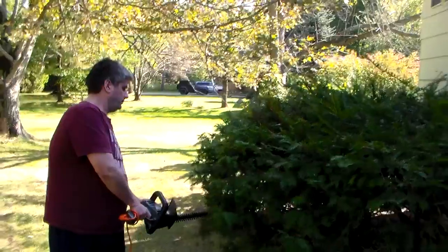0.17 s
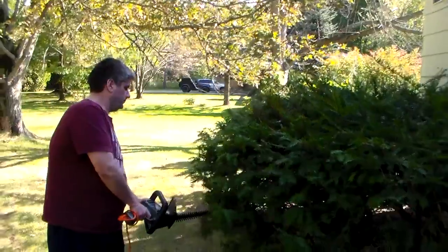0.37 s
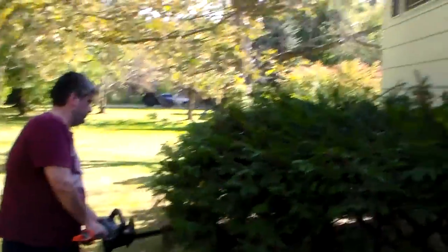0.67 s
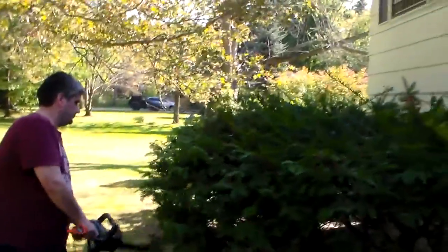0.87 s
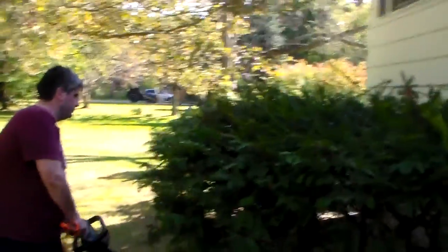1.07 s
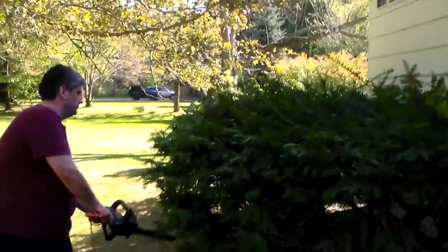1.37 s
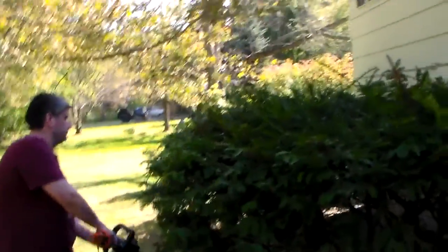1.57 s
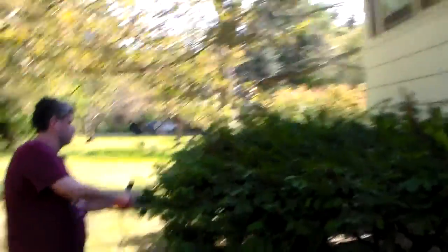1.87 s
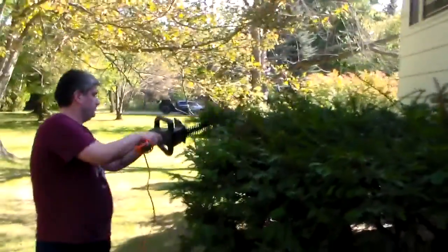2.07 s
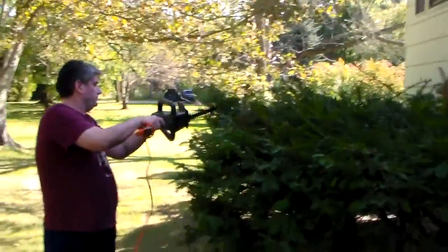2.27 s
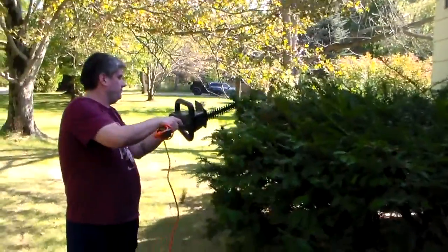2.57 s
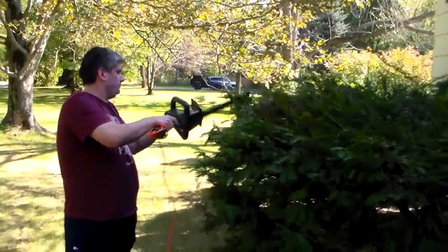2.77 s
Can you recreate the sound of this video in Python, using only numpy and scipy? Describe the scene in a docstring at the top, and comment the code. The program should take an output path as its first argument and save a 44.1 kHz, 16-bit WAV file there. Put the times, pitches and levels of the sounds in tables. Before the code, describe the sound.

An electric hedge trimmer runs continuously outdoors, a few metres off, its motor whining and steel blades rattling. Wind puffs on the microphone at first, twigs crack, then the motor slows and strains with a metallic hiss.

```python
"""Hedge trimmer in a yard

A corded electric trimmer works up the side of a bush, a few metres from the microphone. Its motor whines
and, through a gear pair, drives blades that clatter on every stroke and snip twigs. Raised to the top of
the bush it labours: the speed sags and the gears howl. A breeze bumps the microphone."""
import sys
import numpy as np
from scipy import signal
from scipy.fft import rfft, irfft, next_fast_len
from scipy.io import wavfile
from scipy.ndimage import uniform_filter1d, map_coordinates

SR = 44100
rng = np.random.default_rng(int(sys.argv[2]) if len(sys.argv) > 2 else 0)


def wrap_up_sound(samples):
    """Save the sound to the file named by the first command line argument, as 16-bit audio."""
    columns = np.atleast_2d(samples).T
    # keep every value between -1 and 1, then stretch to whole-number steps
    tamed = np.clip(columns, -1, 1)
    steps = np.round(tamed * 32767).astype(np.int16)
    wavfile.write(sys.argv[1], SR, steps)


N = 128772
FFT_SIZE = next_fast_len(N + 8192)
TIME, FREQ = np.arange(N) / SR, np.fft.rfftfreq(FFT_SIZE, 1 / SR)
PINION_TEETH, WHEEL_TEETH = 8, 50
ENTER_S, LIFT_S, RAISE_S = 0.57, 1.53, 2.007  # the bar goes into the bush, up its side, onto the top


def amp(db):
    """Decibels to gain."""
    return 10 ** (np.asarray(db) / 20)


def unit(x):
    """Scale to rms 1."""
    return x / np.sqrt(np.mean(x ** 2) + 1e-20)


def along(points):
    """(frequency [Hz], value) points read on a log axis."""
    hz, values = np.transpose(points)
    return np.interp(np.log(FREQ + 1), np.log(hz + 1), values)


def curve(rows):
    """(time [s], value) points joined up, one value a sample."""
    return np.interp(TIME, *np.transpose(rows))


def swells(rows):
    """Bell-shaped rises in gain from (time [s], width [s], level [dB]) rows."""
    return sum(amp(db) * np.exp(-.5 * ((TIME - s) / width) ** 2) for s, width, db in rows)


def wobble(rate):
    """A smooth random curve, rate knots a second."""
    return map_coordinates(rng.standard_normal(8192), [TIME * rate], mode="wrap")


def moved(at_s, move_s=0.23):
    """Progress 0-1 of a change of grip centred on at_s."""
    return np.clip((TIME - at_s) / move_s + .5, 0, 1)


def ring(x, colour):
    """Pass x through a causal body of the given colour; rms 1."""
    cepstrum = irfft(np.log(np.maximum(amp(along(colour)), 1e-5)), FFT_SIZE)
    cepstrum[1:FFT_SIZE // 2] *= 2  # fold to minimum phase
    cepstrum[FFT_SIZE // 2 + 1:] = 0
    return unit(irfft(rfft(x, FFT_SIZE) * np.exp(rfft(cepstrum)), FFT_SIZE)[..., :N])


def spread(pair, alike=None):
    """Mix two unrelated signals to left and right with the given likeness, by default the tool's."""
    # left-right likeness of the tool at the microphone (frequency [Hz], correlation [-1 to 1])
    tool_alike = [(150, 1), (300, 1), (650, 0.98), (1400, 1), (2900, 0.93), (4500, 0.9), (6500, 0.4),
                  (8200, 0.24), (14000, .3)]
    turn = np.arccos(np.clip(along(alike or tool_alike), -1, 1)) / 2
    mid, side = irfft(rfft(pair, FFT_SIZE) * [np.cos(turn), np.sin(turn)], FFT_SIZE)[:, :N]
    return unit(np.array([mid + side, mid - side]))


def grit(ticks_per_s=1500, scatter_db=2.5, tick_share=0.46):
    """Two channels of rubbing noise with tiny metal contacts in it."""
    contacts = rng.random(N) < ticks_per_s / SR
    strength = amp(scatter_db * np.clip(rng.standard_normal(N), -2, 2))
    ticks = unit(contacts * strength * rng.choice([-1, 1], (2, N)))
    return np.sqrt(tick_share) * ticks + np.sqrt(1 - tick_share) * rng.standard_normal((2, N))


def stroke_count(turns, lag_strokes=0.11):
    """Blade strokes made so far; they come a little later at the top of the bush."""
    return turns * PINION_TEETH / WHEEL_TEETH - lag_strokes * moved(RAISE_S)


def stroke_force(turns, rise_s=.0014, scatter_s=.0009, scatter_db=.9, drag_db=.5):
    """The blades knock through their play each stroke and rub in between; the foliage drags unevenly."""
    # knocks within one stroke (place in the stroke [0-1], relative level [dB], decay [s])
    knocks = [(.65, 0, .0045), (.88, -1, .0045)]
    # rubbing, stronger deep in the bush (time [s], level against a knock [dB])
    rub = [(.12, -9), (.42, -8.5), (.6, -3.5), (.8, -5), (1.9, -3), (2.1, -5.5)]
    # the blades bite harder or run slack for a moment (time [s], width [s], change in force [dB])
    bites = [(.432, .01, -4), (.89, .012, -3), (1.258, .008, -5), (1.945, .014, 3), (2.012, .012, -3),
             (2.155, .02, -3), (2.36, .008, -4)]
    strokes = stroke_count(turns)
    count = int(strokes[-1]) + 1
    power, t = np.zeros(N + SR), TIME[:SR // 30]
    for place, db, decay in knocks:
        shape = ((1 - np.exp(-t / rise_s)) * np.exp(-t / decay)) ** 2
        late, hard = np.clip(rng.standard_normal((count, 2)), -1.5, 1.5).T
        times = np.interp(np.arange(count) + place, strokes, TIME, right=TIME[-1] + .1) + scatter_s * late
        hits = np.bincount(np.abs(times * SR).astype(int), amp(db + scatter_db * hard) ** 2, N + SR)
        power += signal.fftconvolve(hits, shape / shape.max())[:N + SR]
    force = np.sqrt(np.abs(power[:N]) + amp(curve(rub)) ** 2)
    bite_db = sum(db * np.exp(-.5 * ((TIME - s) / width) ** 2) for s, width, db in bites)
    return unit(force * amp(bite_db + drag_db * wobble(30)))


def rattle(force, poses):
    """Grit driven by the force rings a body, cross-faded over (colour, share of power) poses."""
    return sum(np.sqrt(share) * spread(ring(force * grit(), colour)) for colour, share in poses)


def blades(force):
    """Steel clatter whose colour changes with the way the tool is held."""
    # blade clatter (time [s], level [dB])
    clatter = [(.12, -27.5), (.3, -30.5), (.5, -29), (.65, -29), (.8, -29), (1.1, -28), (1.94, -30),
               (2.01, -31), (2.08, -28.5), (2.25, -29), (2.4, -29.5), (2.92, -28.5)]
    # its colour running light, in the side of the bush, going up, on top (frequency [Hz], gain [dB])
    light = [(820, -34), (1400, -19), (1540, -20), (1620, -7.5), (1830, -13.5), (1950, -6), (2230, -2.5),
             (2330, -19), (2440, -5), (2610, -5), (2790, -12), (2910, -5), (3040, -9), (3430, -13),
             (4060, -11), (5110, -8.5), (5670, -21), (7180, -18), (8200, -28), (16000, -120)]
    side = [(820, -45), (1400, -8.5), (1550, -7), (1830, -0.5), (2590, 0), (3250, -8.5), (3660, -5.5),
            (4000, -7), (4610, -5.5), (5970, -16), (6620, -14), (8200, -18.5), (15000, -120)]
    lifting = [(820, -31), (1400, -6), (1530, -10), (1830, 2), (2120, -2), (2330, 1), (2530, -5.5),
               (2850, -0.5), (3140, -11.5), (3560, -1.5), (3890, -8), (4810, -7), (6190, -20), (6720, -15),
               (8200, -23), (15000, -120)]
    top = [(820, -49), (1400, -40), (1620, -7.5), (1710, -14.5), (1850, -3.5), (1940, -16.5), (2060, -1.5),
           (2150, -3.5), (2350, -15), (2440, -12.5), (2700, -5), (3110, -11), (3350, -18), (3770, -9),
           (3940, -17), (4280, -14), (5000, -17), (5920, -25), (6280, -22), (7620, -30), (15000, -120)]
    entered, lifted, raised = moved(ENTER_S), moved(LIFT_S), moved(RAISE_S)
    poses = [(light, 1 - entered), (side, entered * (1 - lifted)),
             (lifting, lifted * (1 - raised)), (top, raised)]
    return amp(curve(clatter)) * rattle(force, poses)


def housing(force, pulsing=0.24):
    """The plastic shell rings under the same strokes, more evenly."""
    # ring of the shell (time [s], level [dB])
    level = [(.12, -35), (.6, -34.5), (.8, -32.5), (.97, -34), (1.15, -33.5), (1.6, -35.5), (1.85, -32.5),
             (2.1, -35), (2.35, -36)]
    # its colour held low and on top of the bush (frequency [Hz], gain [dB])
    low = [(120, -33), (200, -16), (259, -15), (294, -12.5), (329, -13), (518, -11.5), (579, 0), (647, 0.5),
           (788, -3.5), (951, -8.5), (1040, -6), (1180, -3), (1350, -5.5), (1550, -12), (2020, -47),
           (3410, -120)]
    top = [(120, -38), (200, -12.5), (263, -12.5), (287, -21.5), (407, -13.5), (483, -13), (522, -5.5),
           (564, -7.5), (669, 1), (723, -8.5), (781, -7), (881, -3), (1110, 0), (1330, -6.5), (1550, -8),
           (2020, -30), (3410, -120)]
    raised = moved(RAISE_S)
    return amp(curve(level)) * rattle(force ** pulsing, [(low, 1 - raised), (top, raised)])


def patchy(x, depth_db=1.8):
    """Narrow bands swell and fade as the tool shifts."""
    spectra = signal.stft(x, nperseg=1024)[2]
    patches = uniform_filter1d(rng.standard_normal(spectra.shape[1:]), size=3, axis=0)
    patches = uniform_filter1d(patches, size=12, axis=1)
    return signal.istft(spectra * amp(depth_db * unit(patches)), nperseg=1024)[1][:, :N]


def steel(force):
    """Every knock rings the tool's modes anew; they come and go as the bush damps or frees the bar."""
    # modes of the tool (frequency [Hz], t60 [s], clearest at [s], width [s], level [dB])
    modes = [(2500, .2, .35, .25, -37.5), (3015, .1, .3, .22, -37.5), (2860, .08, 1.93, .1, -35),
             (1270, .08, 2.02, .07, -34)]
    t = TIME[:SR // 3]
    blows = force ** 2 * grit()[0]
    ringing = np.zeros(N)
    for hz, t60, *swell in modes:
        ping = amp(-60 * t / t60) * np.sin(2 * np.pi * hz * t)
        ringing += swells([swell]) * unit(signal.fftconvolve(blows, ping)[:N])
    return ringing


def hiss(force, slide_trim_db=-0.5, air_db=-40.5, left_db=-0.1):
    """Blade slides on blade, and the motor's cooling air rushes out."""
    # sizzle of the sliding steel (time [s], level before trim [dB])
    sizzle = [(.12, -52), (.6, -57), (1.2, -54), (1.95, -48.5), (2.1, -39), (2.4, -38), (2.65, -38),
              (2.92, -43)]
    # colours of the sizzle and the air (frequency [Hz], gain [dB])
    slide_colour = [(6500, -11), (8300, -2), (9000, 12), (9600, 12.5), (10400, 6), (12000, 7.5),
                    (14400, -9.5)]
    air_colour = [(4000, -18), (6000, 2.5), (8000, 1), (9400, 5), (10400, 1.5), (12500, 3.5), (14400, -4)]
    # their left-right likeness (frequency [Hz], correlation [-1 to 1])
    slide_alike = [(8000, 0.22), (10000, 1), (14000, .6)]
    air_alike = [(6000, 0.61), (9400, -0.5), (11000, -0.42), (13500, 0.27)]
    slide = spread(ring(force ** 1.55 * grit(), slide_colour), slide_alike)  # pulses hard
    air = spread(ring(force ** 0.093 * rng.standard_normal((2, N)), air_colour), air_alike)  # near steady
    return (amp(curve(sizzle) + slide_trim_db) * slide + amp(air_db) * air) * amp([[left_db], [-left_db]])


def gears(turns, force, bear_place=.93, slack=.25, give_rad=.5, play_rad=.7, flutter_rad=.36):
    """The meshing tone and its octave swell once a stroke; between, the teeth slacken and catch anew."""
    # gear howl (time [s], level [dB])
    howl_level = [(.12, -39), (.5, -34.5), (.7, -41), (2.01, -42), (2.045, -31), (2.11, -29), (2.16, -34),
                  (2.29, -27), (2.35, -31), (2.62, -32), (2.92, -30.5)]
    # its octave, in spurts while the speed is lowest (time [s], level [dB])
    octave_level = [(.12, -50), (2.33, -47), (2.375, -34), (2.41, -40), (2.455, -33.5), (2.57, -45),
                    (2.63, -38), (2.71, -35), (2.76, -43), (2.81, -39), (2.86, -50)]
    stroke = stroke_count(turns) - bear_place
    catches = rng.standard_normal(int(stroke[-1]) + 2)  # a new slip through the play each stroke
    slip = play_rad * map_coordinates(catches, [np.round(stroke)], order=1, mode="nearest")
    slip = uniform_filter1d(slip, size=128)
    bearing = np.cos(np.pi * stroke) ** 2
    mesh = 2 * np.pi * PINION_TEETH * turns + slip + give_rad * bearing + flutter_rad * wobble(170)
    press = (slack + bearing) * force ** .35
    howl = unit(press * np.sin(mesh))
    octave = unit(press * np.sin(2 * mesh + 2 * flutter_rad * wobble(220)))
    return amp(curve(howl_level)) * howl + amp(curve(octave_level)) * octave


def motor(turns, speed, raised_db=1, whine_order=40, flicker_db=4.5, lead_rad=1.93, left_db=2):
    """The rotor hums; the commutator adds a thin whine, rougher under load."""
    # overtones of the rotor (multiple of the speed, level held low [dB])
    overtones = [(2, -54), (4, -51.5), (9, -43.5), (10, -53.5), (12, -46)]
    # once-a-turn tone of the rotor, and commutator whine (time [s], level [dB])
    unbalance = [(.12, -51), (.8, -47.5), (.95, -53), (1.25, -52.5), (1.35, -49.5), (1.96, -47.5),
                 (2.04, -58)]
    whine_level = [(.12, -38), (.52, -42), (.66, -46), (.85, -39.5), (1.2, -44.5), (1.5, -44), (1.8, -38),
                   (2.05, -41.5), (2.4, -49), (2.7, -50), (2.9, -34.5)]
    angle = 2 * np.pi * turns
    hum = np.zeros(N)
    for order, db in overtones:
        gain = amp(db + 0.92 * wobble(10.1))
        hum += gain * np.sin(order * angle + 0.27 * np.sqrt(order) * wobble(39.88))
    hum = amp(raised_db * moved(RAISE_S)) * hum + amp(curve(unbalance)) * np.sin(angle)
    load = (speed.max() - speed) / np.ptp(speed)
    phase = whine_order * angle + (.7 + 1.3 * load) * wobble(250)
    whine = np.array([amp(db + flicker_db * wobble(39.96)) * np.sin(phase + lead)
                      for db, lead in [(left_db, lead_rad), (-left_db, 0)]])
    return np.sqrt(2) * hum + amp(curve(whine_level)) * unit(whine)


def wind(trim_db=2, lumpy_db=1.0):
    """A low flutter on the microphone, leaning left, with a few stronger puffs leaning right."""
    # breeze on the microphone (time [s], level before trim [dB])
    breeze = [(0.13, -37.5), (0.25, -42), (0.34, -49), (0.43, -46), (1.5, -46), (1.85, -47), (1.99, -52)]
    # puffs of wind (time [s], width [s], level [dB])
    gusts = [(.18, 0.1, -29), (0.25, 0.016, -34), (.295, 0.048, -39.5), (0.433, 0.022, -37)]
    # colours of the breeze and the puffs (frequency [Hz], gain [dB])
    breeze_colour = [(10, -7.5), (28, 2.5), (55, -6), (110, -8), (200, -18), (400, -26), (900, -57)]
    puff_colour = [(10, 10.5), (50, -5.5), (130, 0.5), (230, -9), (350, -17.5), (800, -42)]
    # left-right likeness of both (frequency [Hz], correlation [-1 to 1])
    alike = [(30, 0.52), (300, 0.2)]
    strength = amp(curve(breeze) + trim_db + lumpy_db * wobble(22))
    flutter = strength * spread(ring(rng.standard_normal((2, N)), breeze_colour), alike)
    puffs = swells(gusts) * spread(ring(rng.standard_normal((2, N)), puff_colour), alike)
    return flutter * amp([[1], [-1]]) + puffs * amp([[-2], [2.1]])


def twigs():
    """Short cracks as thicker twigs are cut."""
    # twigs snapping (time [s], level [dB], decay [s])
    snaps = [(.2716, -21, .002), (1.0314, -23, .0025), (2.3264, -24, .007), (2.5145, -24, .0025)]
    # colour of a snap (frequency [Hz], gain [dB])
    colour = [(500, -28), (2200, 1), (3600, 6.5), (5000, -3), (8000, -11), (14000, -16)]
    cracks = sum(amp(db) * (TIME >= s) * np.exp(-np.abs(TIME - s) / decay) for s, db, decay in snaps)
    return cracks * spread(ring(rng.standard_normal((2, N)), colour))


def cutting(force):
    """Needles crunch in the teeth and brush the bar; the shell booms as the blade bears on the bush."""
    # needles shredded, needles brushing, booms of the shell (time [s], width [s], level [dB])
    crunches = [(.59, 0.056, -33.5), (.66, 0.0079, -29), (.97, 0.022, -35), (1.48, .04, -41)]
    brushes = [(.79, 0.027, -45), (1.005, 0.017, -40), (1.83, .035, -44)]
    booms = [(.97, 0.052, -36)]
    # the colour of each (frequency [Hz], gain [dB])
    crunch_colour = [(2500, -23), (3800, -9), (4500, 3.5), (5200, -7), (7500, -17), (12000, -19)]
    brush_colour = [(5000, -14), (8000, -1), (10000, 5), (14000, -9)]
    boom_colour = [(400, -32), (570, -10), (655, 8), (760, -12), (1000, -34)]
    crunch = swells(crunches) * spread(ring(force * grit(), crunch_colour))
    brush = swells(brushes) * spread(ring(grit(), brush_colour))
    boom = swells(booms) * spread(ring(np.sqrt(force) * grit(), boom_colour))
    return crunch + brush + boom


def scene():
    """The trimmer a few metres off, one motor speed driving every part, and wind at the microphone."""
    # motor speed (time [s], speed [turns/s])
    motor_speed = [(0.11, 291.5), (0.29, 296.2), (0.54, 298.0), (0.62, 294.5), (0.7, 287.2), (0.87, 297.0),
                   (1.45, 299.1), (1.8, 301.2), (1.98, 298.0), (2.1, 286), (2.16, 281.5), (2.22, 286),
                   (2.28, 285), (2.33, 263.5), (2.48, 266.0), (2.62, 260.0), (2.72, 267.0), (2.84, 277.0),
                   (2.92, 276.8)]
    speed = curve(motor_speed)
    turns = np.cumsum(speed) / SR
    force = stroke_force(turns)
    clatter = patchy(blades(force) + housing(force)) + steel(force)
    tool = clatter + hiss(force) + gears(turns, force) + motor(turns, speed)
    return tool + cutting(force) + twigs() + wind()


def record(dry, start_s=.111, ceiling=.24, top_hz=14450):
    """The microphone opens abruptly, rounds the highest peaks and passes nothing above its band limit."""
    sound = dry * np.clip((TIME - start_s) * 1000, 0, 1)  # 1 ms fade-in
    sound = sound / (1 + np.abs(sound / ceiling) ** 6) ** (1 / 6)
    return irfft(rfft(sound, FFT_SIZE) * (FREQ < top_hz), FFT_SIZE)[:, :N]


dry = scene()
out = record(dry)
wrap_up_sound(out)
```